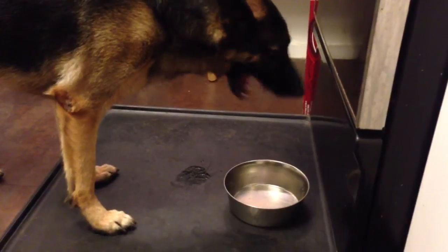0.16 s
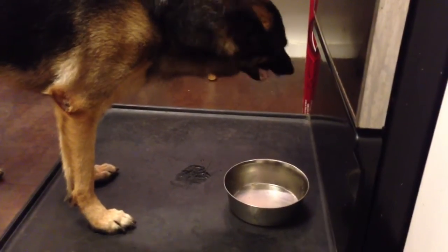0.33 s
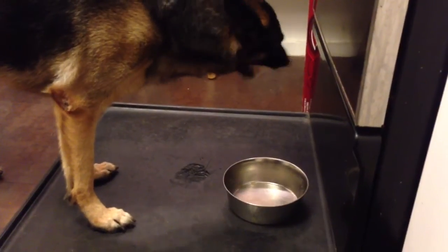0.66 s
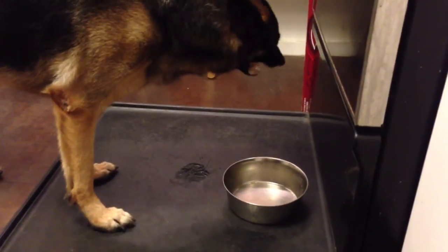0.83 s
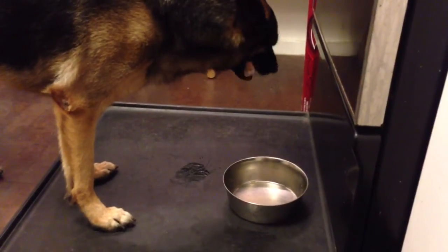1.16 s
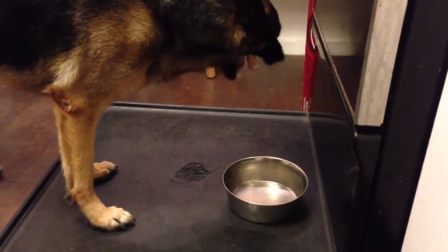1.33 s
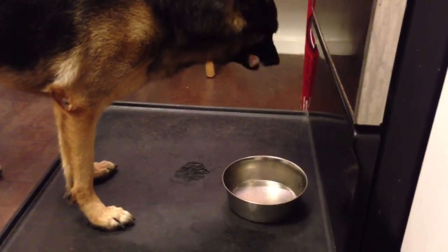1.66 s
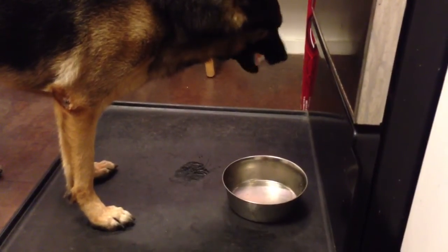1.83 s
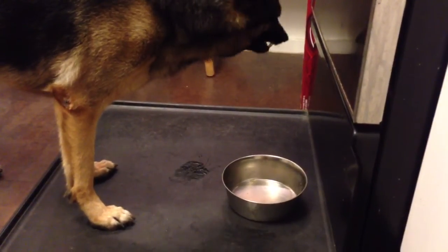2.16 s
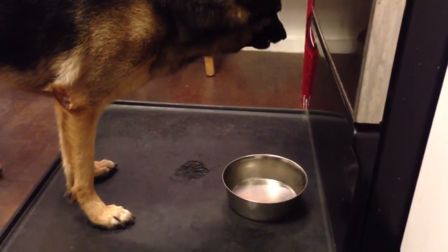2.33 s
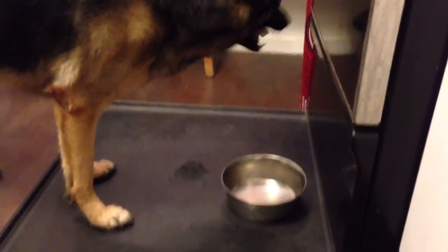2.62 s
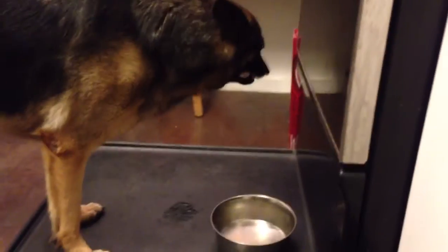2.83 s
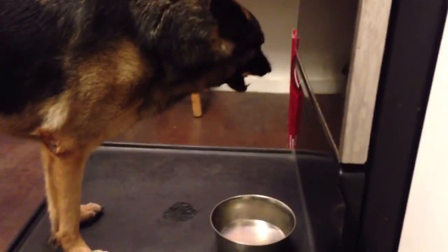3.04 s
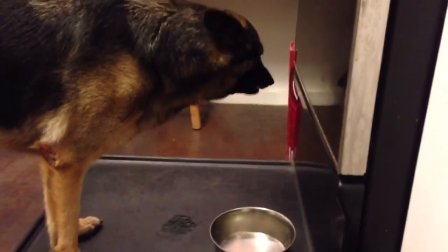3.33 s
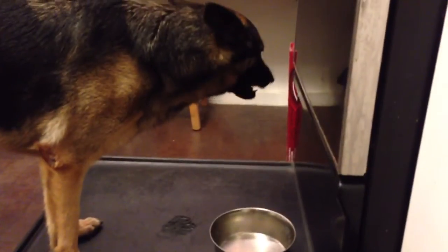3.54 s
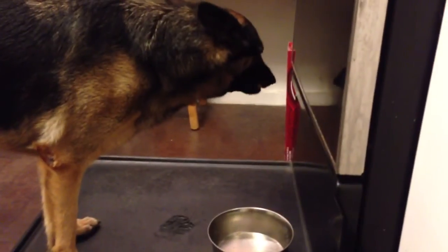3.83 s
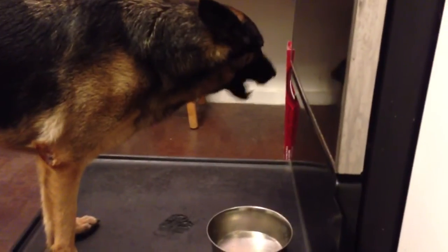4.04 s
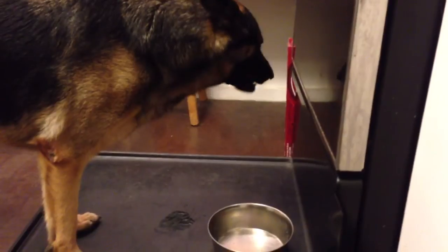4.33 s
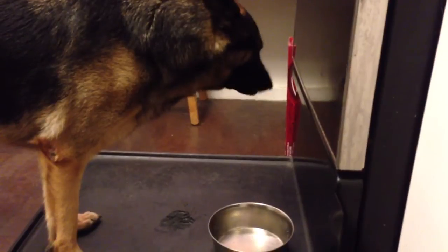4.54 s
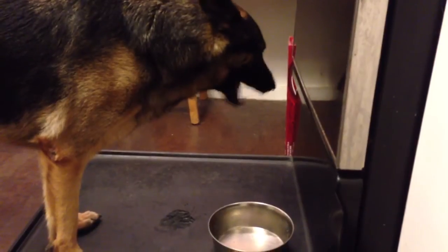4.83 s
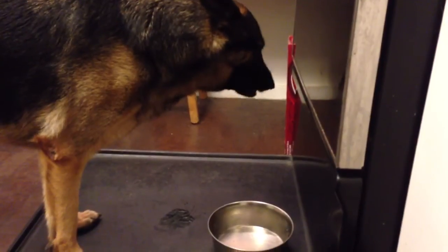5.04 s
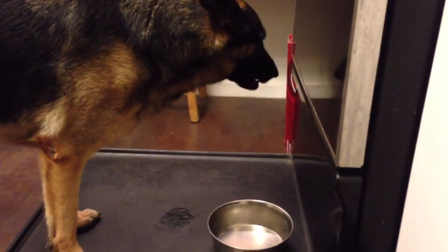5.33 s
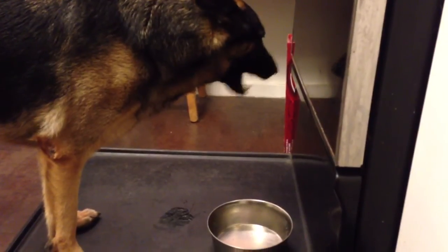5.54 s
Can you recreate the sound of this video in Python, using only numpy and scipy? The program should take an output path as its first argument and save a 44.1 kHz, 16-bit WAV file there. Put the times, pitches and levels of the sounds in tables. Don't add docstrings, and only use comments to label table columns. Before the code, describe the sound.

Bone snaps and splinters between a dog's teeth, one crack very loud, amid moist chewing and hollow pops over quiet room hum.

```python
import sys
import numpy as np
from scipy import signal
from scipy.fft import rfft, irfft
from scipy.io import wavfile
from scipy.ndimage import uniform_filter1d

SR = 44100
rng = np.random.default_rng(int(sys.argv[2]) if len(sys.argv) > 2 else 0)


def generate_wav(sig):
    pcm = np.round(np.clip(np.atleast_2d(sig).T, -1, 1) * 32767).astype(np.int16)
    wavfile.write(sys.argv[1], SR, pcm)


def gain_from_db(level_db):
    decades = np.asarray(level_db, float) / 20
    return 10 ** decades


N = 250488

# (frequency [Hz], density [dB per Hz])
AIR_SPECTRUM = [(15, -58), (25, -26), (76, -26), (108, -8.5), (223, -2.5), (256, -2), (344, -4), (373, -19),
                (405, -4.5), (463, -11), (863, -11.5), (1130, -11), (8830, -29), (14800, -38.5),
                (16000, -25)]
# (frequency [Hz], width [Hz], level over the air [dB])
FAN_HUM = [(118.8, 9.7, -28), (248, 96, -8), (628, 66, -14), (864, 46, -14.5), (1250, 17, -15.5)]
# (time [s], level [dB])
MOUTH_GAPE = [(0.0, -7), (0.36, 1), (0.63, -2), (0.98, 3), (1.19, -7), (1.49, -3.5), (2.24, -1.5),
              (2.48, -6), (2.7, 6), (2.9, -4), (3.4, 2), (3.6, 0), (4.3, -12), (5.05, -3.5), (5.22, -12),
              (5.68, -4)]
# (time [s], crackle rise [dB])
BITES = [
    (0.96, 19.5),
    (2.235, 8),
    (2.85, 15),
    (3.84, 11),
    (5.055, 14),
]
# (frequency [Hz], width [Hz], level [dB])
FLESH_COLOUR = [(880, 300, -15.5), (1840, 1160, 9), (3900, 2800, 3.5), (8800, 6000, -16)]
# (time [s], rise [dB], half length [s])
TONGUE_SWELLS = [
    (.17, 2.5, 0.055),
    (.62, 2, 0.042),
    (1.4, 3, 0.04),
    (1.597, 7.5, .04),
    (1.907, 4.5, 0.048),
    (3.298, 1, 0.085),
    (4.513, 3.5, .1),
    (4.933, 2, 0.058),
]
# (time [s], peak [dB], centre [Hz])
SALIVA_TICKS = [(0.1945, -49, 4890), (0.4329, -51, 5880), (0.619, -45, 4330), (0.6794, -53, 4130),
                (0.7394, -49, 4160), (1.385, -47, 4670), (1.4794, -52, 4920), (2.0183, -45, 5700),
                (3.0494, -58, 5220), (3.509, -48, 4340), (4.4994, -56, 4130), (4.8763, -53, 4300),
                (4.9344, -49, 4570)]
# (time [s], splinter peak [dB], splinter ring [Hz], shaft 1.85-3.3 kHz [dB], snap
# 6-16 kHz [dB])
BONE_BREAKS = [(0.8101, -29, 5000, -38, -35), (0.864, -52, 3010, -47, -46), (0.8922, -24, 4450, -29, -34),
               (0.8955, -19.5, 5160, -30, -27.5), (0.9433, -36, 5160, -19, -14.5),
               (0.9443, -10, 5270, -9, -13), (0.948, -28, 2900, -16, -32), (0.9578, -25, 3820, -31, -41),
               (1.0154, -20, 3480, -26.5, -27), (1.374, -49, 4670, -61, -48),
               (2.1804, -40, 3600, -38, -40.5), (2.2262, -32, 4000, -42, -37),
               (2.2395, -29, 3830, -49, -35), (2.8499, -20, 4800, -24, -28), (2.8604, -25, 3200, -27, -37),
               (3.8347, -20, 4220, -27, -32), (3.8537, -28.5, 3350, -25, -29),
               (3.8678, -37, 3100, -38, -39), (4.976, -46, 3300, -45, -41), (5.05, -42, 4400, -42, -40),
               (5.062, -39, 4600, -41, -42)]
# (time [s], peak [dB], ring [Hz], volley length [ms])
BONE_SPLINTERS = [(0.313, -43.5, 4280, 3.1), (1.4994, -49, 7200, 2.8), (1.578, -42, 5960, 7.5),
                  (1.6057, -43, 6200, 2.5), (2.199, -41.5, 3600, 12), (2.2363, -29, 3600, 2.3),
                  (2.244, -38, 3700, 6.8), (2.278, -36, 3630, 25), (2.303, -40.5, 5850, 10),
                  (2.318, -40, 14700, 3.5), (2.7207, -23, 5150, 2.6), (2.7404, -39, 4680, 2.5),
                  (2.77, -30.5, 3900, 4), (2.786, -42, 3930, 4.3), (2.8246, -28, 6050, 5.6),
                  (2.8305, -29.5, 3000, 12), (2.8836, -30, 3050, 2.5), (3.2111, -44, 3890, 2.5),
                  (3.274, -36.5, 3450, 2.7), (3.785, -28, 4700, 4), (3.786, -30, 6540, 4),
                  (4.9227, -45, 4540, 2.5), (4.995, -41.5, 4190, 3.6), (5.054, -25, 4550, 4),
                  (5.055, -38, 3370, 3.7)]
# (time [s], peak [dB], volley length [ms])
BONE_SHAFTS = [(0.339, -44, 2.7), (0.936, -31, 8.5), (1.6057, -45, 2.5), (1.6547, -43, 4.1),
               (2.262, -39, 7), (2.29, -44, 12), (2.765, -33.5, 5), (2.7705, -32, 2.1), (2.866, -30.5, 8.3),
               (2.8734, -28.5, 6), (3.3563, -41.5, 3.8), (4.995, -44, 3.6), (5.6143, -43, 2.5)]
# (time [s], peak [dB], pitch [Hz], ring t60 [s])
MOUTH_POPS = [(0.744, -42, 1550, 0.031), (0.811, -37.5, 1636, 0.036), (0.898, -30, 1580, 0.067),
              (0.945, -17.5, 1094, 0.009), (0.953, -29, 2050, 0.08), (1.014, -30, 1715, 0.036),
              (2.099, -31.5, 1176, 0.033), (2.769, -32.5, 1680, 0.029), (2.824, -31, 1204, 0.097),
              (2.85, -24.5, 1156, 0.026), (2.852, -25, 1690, 0.02), (2.861, -26, 1250, 0.04),
              (2.872, -28, 1250, 0.018), (2.884, -32.5, 930, 0.017), (3.273, -44.5, 673, 0.031),
              (3.285, -43.5, 1150, 0.047), (3.361, -44.5, 840, 0.03), (3.788, -37, 1014, 0.021),
              (3.836, -22.5, 953, 0.098), (3.837, -19, 1002, 0.043), (3.836, -26.5, 791, 0.03),
              (4.877, -33, 1016, 0.023), (4.977, -40, 1890, 0.015), (5.011, -30, 1950, 0.014),
              (5.054, -29, 706, 0.054), (5.066, -33, 1600, 0.035), (5.595, -39.5, 1060, 0.032),
              (5.614, -32.5, 966, 0.072), (5.615, -32.5, 1007, 0.042)]
# (time [s], peak [dB], pitch [Hz], ring t60 [s])
JAW_THUMPS = [
    (0.945, -21, 223, 0.067),
    (2.852, -35.5, 305, 0.033),
    (3.835, -33.5, 227, 0.14),
    (5.614, -40, 228, 0.051),
]
# (frequency [Hz], t60 [s], level [dB])
WALL_BANDS = [(250, 0.067, -9), (640, 0.26, 20.5), (1140, 0.43, -13), (2050, 0.52, 5), (3600, 0.34, 7.5),
              (8000, 0.26, 5.5), (13100, 0.11, 6)]

AIR_DB = -52
CRACKLE_DB, CRACKLE_GAPE_SHARE, RUSTLE_DB = -58.5, 0.46, -62
SQUEEZE_S, LET_GO_S = 0.03, 0.18
BREAK_MS, BREAK_MS_PER_DB = 2.36, 0.03
SPLINTER_SHAFT_DB, SPLINTER_SNAP_DB = -15, -16.5
SHAFT_RING_HZ, SHAFT_RING_DB, SHAFT_SNAP_DB = 3280, -17, -21
WALLS_DB, WALLS_GAP_S = -4.5, 0.0012
TOP_HZ, BASS_HZ = 15300, 110


def band(x, hz, width):
    centre = min(hz, .45 * SR)
    return signal.lfilter(*signal.iirpeak(centre, max(hz / width, .3), fs=SR), x)


def steep(x, lo_hz, hi_hz):
    sos = signal.butter(4, [lo_hz, min(hi_hz, .4 * SR)], "band", fs=SR, output="sos")
    return signal.sosfilt(sos, x)


def peak(x, db):
    return x * gain_from_db(db) / np.max(np.abs(x))


def level(x, db):
    return x * gain_from_db(db) / np.sqrt(np.mean(x ** 2))


def add(out, x, s):
    i = int(s * SR)
    out[i:i + len(x)] += x[:N - i]


def walk(rate):
    hold = int(SR / rate)
    steps = np.repeat(rng.standard_normal(N // hold + 1), hold)
    return 1.3 * uniform_filter1d(uniform_filter1d(steps, hold), hold)[:N]


def air():
    hz, db = np.transpose(AIR_SPECTRUM)
    f = np.arange(N // 2 + 1) * SR / N + 1
    colour = gain_from_db(np.interp(np.log(f), np.log(hz), db))
    hiss = level(irfft(rfft(rng.standard_normal(N)) * colour, N), 0)
    hum = np.zeros(N)
    for f0, width, over_air_db in FAN_HUM:
        tone = band(band(rng.standard_normal(N), f0, width), f0, 2 * width)
        hum += level(tone, over_air_db) * gain_from_db(0.82 * walk(5.77))
    return gain_from_db(AIR_DB) * (hiss + hum)


def flesh():
    t = np.arange(N) / SR
    gape_db = np.interp(t, *np.transpose(MOUTH_GAPE))
    bite_db = sum(np.interp(t, [s - SQUEEZE_S, s, s + LET_GO_S], [0, db, 0]) for s, db in BITES)
    swell_db = sum(db * np.exp(-((t - s) / half) ** 2) for s, db, half in TONGUE_SWELLS)

    clicks = rng.standard_normal(N) * (rng.random(N) < .05)
    clicks *= gain_from_db(3.0 * np.minimum(rng.exponential(size=N), 3))
    wet = sum(gain_from_db(db) * band(band(clicks, hz, width), hz, width) for hz, width, db in FLESH_COLOUR)
    crackle = level(wet, -5.0) * gain_from_db(CRACKLE_DB + CRACKLE_GAPE_SHARE * gape_db + bite_db)

    rustle = steep(rng.standard_normal(N) * gain_from_db(4.7 * walk(60)), 5600, 15000)
    rustle = level(rustle, -10.5) * gain_from_db(RUSTLE_DB + gape_db)

    out = (crackle + rustle) * gain_from_db(swell_db)
    for s, db, hz in SALIVA_TICKS:
        tick = rng.standard_normal(512) * np.exp(-t[:512] / .002)
        add(out, peak(band(band(tick, hz, hz / 3), hz, hz / 1.2), db), s)
    return out


def fractures():
    cracks = []
    for s, db, hz, shaft_db, snap_db in BONE_BREAKS:
        cracks.append((s, db, hz, shaft_db, snap_db, BREAK_MS + BREAK_MS_PER_DB * max(db, shaft_db)))
    for s, db, hz, ms in BONE_SPLINTERS:
        cracks.append((s, db, hz, db + SPLINTER_SHAFT_DB, db + SPLINTER_SNAP_DB, ms))
    for s, db, ms in BONE_SHAFTS:
        cracks.append((s, db + SHAFT_RING_DB, SHAFT_RING_HZ, db, db + SHAFT_SNAP_DB, ms))
    return cracks


def splinter_colour(x, hz):
    ring = band(band(x, hz, hz / 3), hz, hz / 2)
    halo = steep(x, max(0.68 * hz, 3000), max(1.32 * hz, 6500))
    return 1.6 * ring + .4 * halo


def shaft_colour(x, hz):
    return steep(x, 1850, 3300)


def snap_colour(x, hz):
    return steep(band(band(x, 8800, 3600), 9000, 7000), 6000, 16000)


def bone():
    near, far, t = np.zeros(N), np.zeros(N), np.arange(2048) / SR
    impulse = 1. * (t == 0)
    colours = [splinter_colour, shaft_colour, snap_colour]
    for s, db, hz, shaft_db, snap_db, ms in fractures():
        u = t / (ms / 1000)
        volley = u ** 0.63 * np.exp(-1.7 * u) * gain_from_db(5.5 * rng.standard_normal(len(t)))
        for colour, part_db in zip(colours, (db, shaft_db, snap_db)):
            ring = peak(colour(volley * rng.standard_normal(len(t)), hz), part_db)
            blow = colour(impulse, hz)
            blow = blow * np.sqrt(np.sum(ring ** 2) / np.sum(blow ** 2))
            add(near, ring, s)
            add(far, blow + .5 * ring, s)
    return near, far


def knocks(table, push_cycles, ragged_db):
    out, t = np.zeros(N), np.arange(8192) / SR
    for s, db, hz, t60 in table:
        swell = 1 - np.exp(-(t * hz / push_cycles) ** 2)
        decay = np.exp(-np.log(1000) * t / t60)
        ragged = level(band(rng.standard_normal(len(t)), hz, hz / 3.5), ragged_db)
        ring = np.sin(2 * np.pi * hz * t) + ragged
        add(out, peak(swell * decay * ring, db), s)
    return out


def walls(x):
    t = np.arange(SR // 2) / SR
    echoes = rng.standard_normal(len(t)) * (rng.random(len(t)) < .01 + (t / .05) ** 2)
    echoes = echoes / np.sqrt(np.clip(0.0054 + (t / 0.057) ** 2, 0, 1))
    echoes = echoes * (1 - np.exp(-(t / WALLS_GAP_S) ** 2))
    tail = sum(gain_from_db(db - 60 * t / t60) * band(echoes, hz, 1.6 * hz) for hz, t60, db in WALL_BANDS)
    tail = tail * gain_from_db(WALLS_DB) / np.sqrt(np.sum(tail ** 2))
    return signal.fftconvolve(x, tail)[:N]


def scene():
    room_noise = air()
    wet = flesh()
    near, far = bone()
    pops = knocks(MOUTH_POPS, 1.1, -9.5)
    thumps = knocks(JAW_THUMPS, 0.37, -13)
    reverb = walls(far + wet + 0.94 * pops + thumps)
    chewing = near + pops + thumps + wet + reverb
    chewing = signal.sosfilt(signal.butter(4, BASS_HZ, "high", fs=SR, output="sos"), chewing)
    return (chewing + room_noise)[None]


def low_pass(x):
    return signal.sosfilt(signal.butter(12, 16310, fs=SR, output="sos"), x)


def record(dry):
    mix = signal.sosfilt(signal.ellip(7, .3, 30, TOP_HZ, fs=SR, output="sos"), dry)
    return low_pass(mix)


dry = scene()
out = record(dry)
generate_wav(out)
```